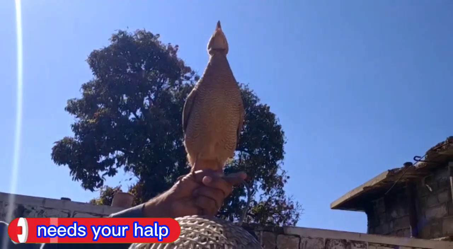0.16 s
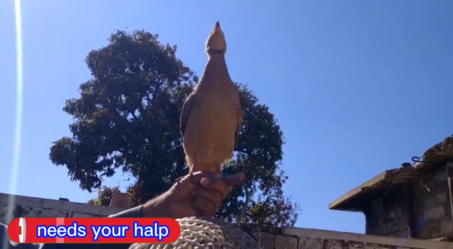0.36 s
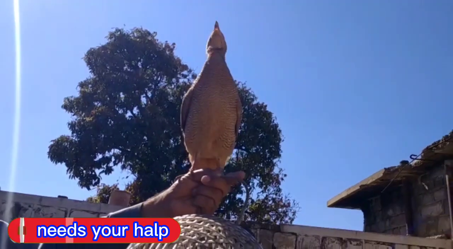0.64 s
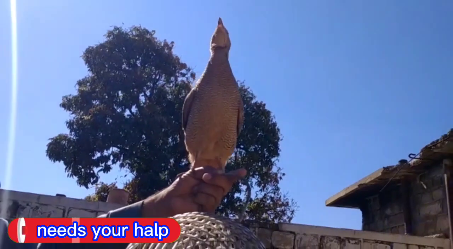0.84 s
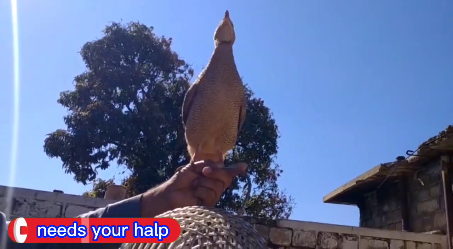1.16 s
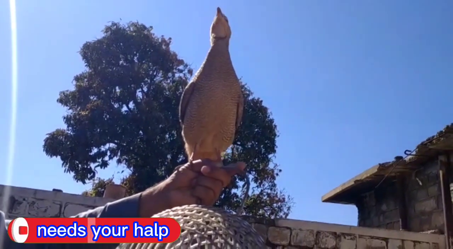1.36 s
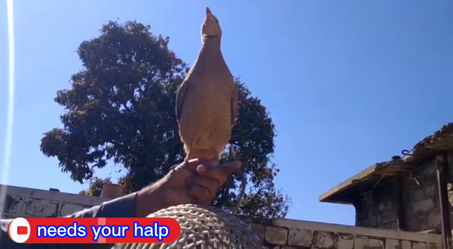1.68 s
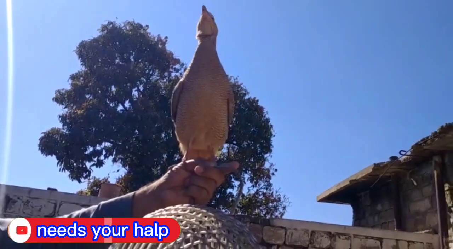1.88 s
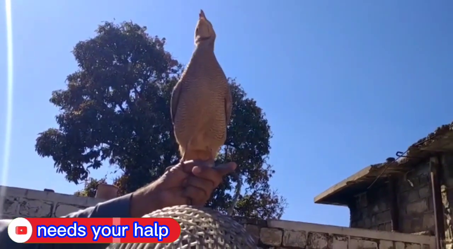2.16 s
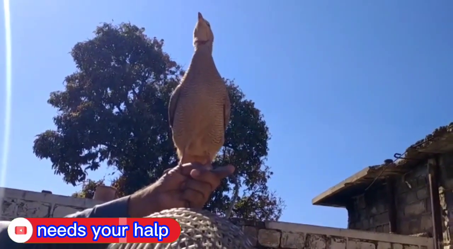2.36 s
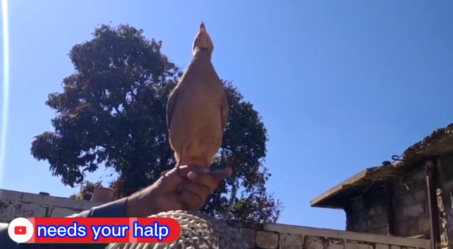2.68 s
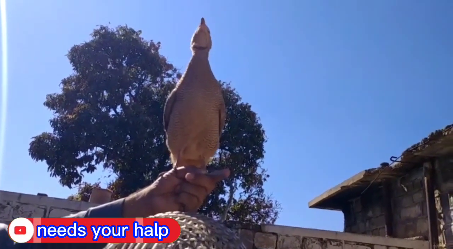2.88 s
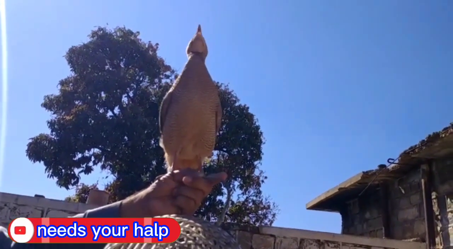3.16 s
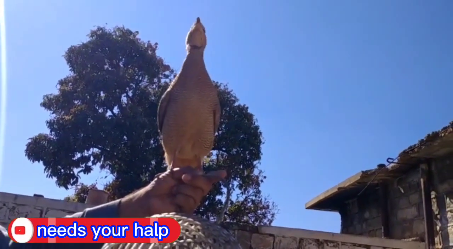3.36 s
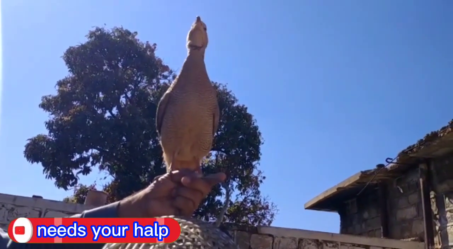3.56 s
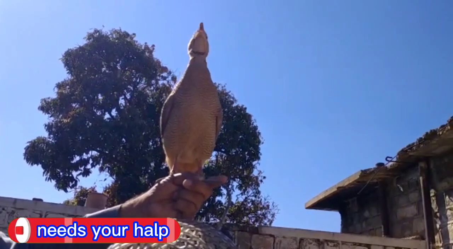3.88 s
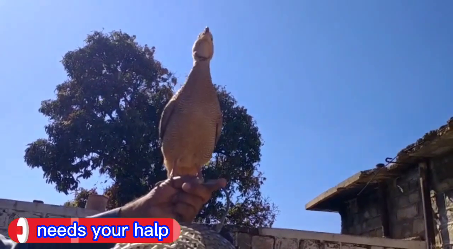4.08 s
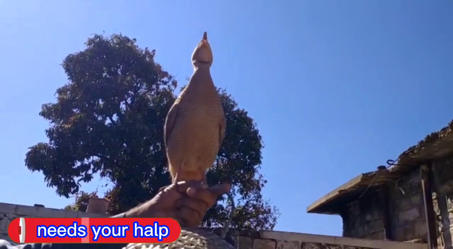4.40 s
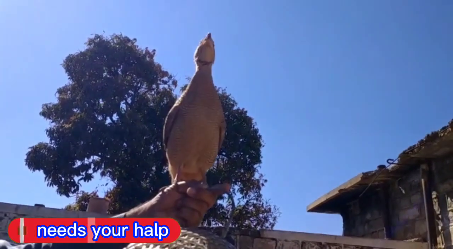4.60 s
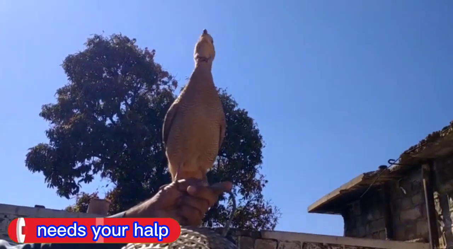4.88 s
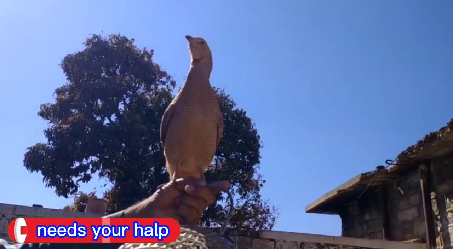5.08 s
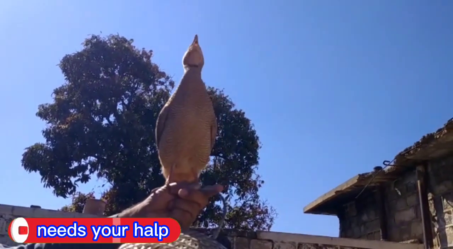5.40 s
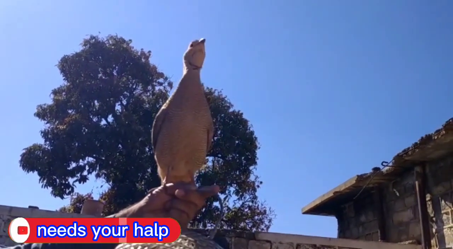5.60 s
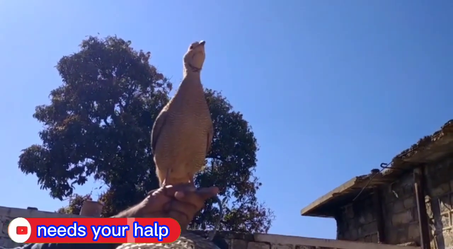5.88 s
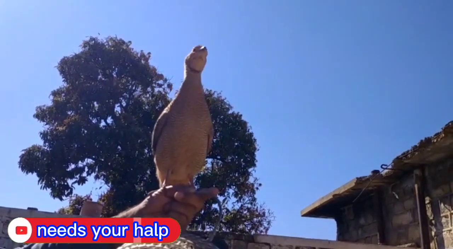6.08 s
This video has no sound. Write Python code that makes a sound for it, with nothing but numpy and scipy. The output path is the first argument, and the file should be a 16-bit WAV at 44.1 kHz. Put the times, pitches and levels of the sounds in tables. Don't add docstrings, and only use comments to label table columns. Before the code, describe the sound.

A francolin very close to the microphone calls in a steady, rapid cycle: two low buzzy chucks, a loud clear whistle with a hoarse start, a shrill squeal and a quick falling note. Near the end the cycle loosens into a run of fading chucks, then a whistle, squeal, more chucks and a last whistle. A second bird gives softer rising two-step whistles. Walls return short diffuse echoes; light wind rumbles, with one gust around three seconds.

```python
import sys
import numpy as np
from scipy import signal
from scipy.fft import rfft, irfft, next_fast_len
from scipy.io import wavfile
from scipy.ndimage import uniform_filter1d, map_coordinates

SR = 44100
rng = np.random.default_rng(int(sys.argv[2]) if len(sys.argv) > 2 else 0)


def linear_from_db(decibels):
    return 10 ** (np.asarray(decibels, float) / 20)


def output_pcm(signal):
    pcm = np.clip(np.atleast_2d(signal).T, -1, 1) * 32767
    wavfile.write(sys.argv[1], SR, np.round(pcm).astype(np.int16))


N = 275625

# time_s, level_db
WIND_LEVEL = [(0, -69), (.3, -56.5), (1.3, -58.5), (2.4, -54), (2.6, -41), (2.85, -35), (3.02, -44.5),
              (3.12, -41.5), (3.23, -30), (3.45, -49), (3.6, -54.5), (4.5, -57.5), (5.0, -54.5),
              (6.25, -59.5)]
# start_s, length_s, level_db
PUFFS = [(0.169, 0.12, -41.5), (0.44, 0.086, -39.5), (0.62, 0.12, -35.5), (0.995, 0.17, -30),
         (1.406, 0.046, -51), (1.466, 0.063, -36.5), (1.607, 0.13, -41), (1.955, 0.13, -39.5),
         (2.164, 0.12, -36.5), (2.473, 0.03, -48), (3.659, 0.13, -42.5), (3.838, 0.093, -36.5),
         (4.11, 0.04, -35.5), (4.201, 0.133, -39.5), (4.395, 0.106, -43), (5.058, 0.036, -53),
         (5.263, 0.084, -35.5), (5.441, 0.11, -46.5), (5.856, 0.067, -45), (6.039, 0.12, -35.5)]
# frequency_hz, level_db
RUMBLE_SPECTRUM = [(20, -58), (50, -36.5), (100, -1), (150, -0.5), (300, -5), (600, -10), (1000, -13.5),
                   (2000, -48)]
# frequency_hz, level_db
HISS_SPECTRUM = [(100, -9), (1000, 7), (3500, 13), (5000, 3.5), (7500, 7), (10000, -2), (14000, -7.5),
                 (15700, 4), (16000, -68)]
# start_s, level_db, start_pitch_hz, end_pitch_hz, length_s
FAR_SONG = [
    (.03, -64, 4700, 3200, .06),
    (.075, -64, 3400, 1500, .05),
    (4.975, -62, 2900, 4250, .055),
    (5.03, -58, 4250, 4400, .05),
    (.03, -62, 7700, 7100, .07),
    (4.74, -61, 7500, 7400, .24),
]

# start_s, length_s, start_pitch_hz, end_pitch_hz, level_db
OPENING = (0.15, 0.12, 1061.5, 968, -16)
# start_s, level_db, pitch_hz, length_s, lead_in_s
WHISTLES = [(.175, -8, 2000, .042, .038), (.446, -6, 2318, .058, .052), (1.001, -6, 2350, .052, .056),
            (1.471, -5, 2357, .064, .056), (2.010, -4.5, 2360, .066, .05), (2.566, -5.5, 2370, .068, .048),
            (3.124, -5.5, 2370, .067, .049), (3.679, -5.5, 2362, .067, .049), (4.253, -5, 2356, .069, .051),
            (5.268, -7, 2320, .069, .048), (6.081, -7, 2330, .068, .05)]
# frequency_hz, level_db
BEAK_SPECTRUM = [(2500, -1), (4000, -14), (4700, -17.5), (6000, -31.5), (6930, -17), (7070, -26.5),
                 (8000, -26.5), (12000, -53.5)]
# frequency_hz, level_db
SCRAPE_SPECTRUM = [(400, -31.5), (1000, -3.5), (2800, 4), (4500, -1), (7000, -11), (9500, -27),
                   (16000, -33)]
# start_s, length_s, start_ratio, middle_ratio, end_ratio (of its pitch), roughness
WHISTLE_LEAD = [
    (-.048, .015, .52, .6, .66, .15),
    (-.034, .014, .8, .7, .52, .2),
    (-.021, .021, .465, .475, .495, .1),
]
WHISTLE_LEAD_DB = [
    [-21.5, -14, -20.5, -22.5, -26.5, -36, -49, -45],
    [-21, -16.5, -28.5, -24.5, -44.5, -49, -53],
    [-16.5, -14, -19, -26, -19, -28, -30, -49, -49.5],
]
# start_s, length_s, start_ratio, middle_ratio, end_ratio, roughness
WHISTLE_AFTER = [
    (0, .009, .98, .93, .84, .2),
    (.008, .022, .47, .465, .45, .25),
]
WHISTLE_AFTER_DB = [
    [-17, -21, -21, -34, -44],
    [-21, -32, -27, -35, -34, -34],
]

# frequency_hz, t60_s
YARD_DECAY = [(300, 0.13), (1500, 0.49), (2500, 0.5), (5000, 0.4), (10000, 0.37)]
# frequency_hz, level_db
CARRY_SPECTRUM = [(300, -17.5), (900, -1.5), (1600, 0.5), (2600, 3), (5000, -1), (7000, 1), (9000, 10),
                  (16000, -15)]

# start_s, length_s, start_pitch_hz, end_pitch_hz, level_db
LOW_STEPS = [
    (.164, 0.049, 1550, 2140, -16.5),
    (.783, 0.07, 1500, 2146, -11.5),
    (1.451, 0.027, 1925, 2060, -15.5),
    (5.084, 0.042, 1967, 2167, -13),
    (5.899, 0.044, 1817, 2070, -11),
]
# start_s, length_s, start_pitch_hz, end_pitch_hz, level_db
HIGH_STEPS = [
    (.228, 0.049, 2580, 2750, -23),
    (.29, 0.043, 2810, 2855, -19),
    (.85, 0.038, 2550, 2760, -12.5),
    (1.495, 0.087, 2670, 2766, -20.5),
    (2.1, 0.054, 2735, 2790, -20.5),
    (4.517, 0.11, 2750, 2672, -19.5),
    (4.615, 0.077, 2750, 2737, -38.5),
    (5.122, 0.042, 2657, 2784, -19),
    (5.16, 0.089, 2790, 2765, -24),
    (5.94, 0.094, 2530, 2740, -12),
]

# start_s, level_db, start_pitch_hz, end_pitch_hz, length_s
HIGH_FALLS = [
    (.238, -15, 2540, 2170, 0.022),
    (.690, -15.5, 2554, 2206, 0.029),
    (1.118, -17, 2580, 2180, .029),
    (2.238, -18, 2560, 2190, 0.027),
    (2.793, -16.5, 2574, 2223, 0.025),
    (3.352, -16.5, 2572, 2264, 0.024),
]
# start_s, level_db, start_pitch_hz, end_pitch_hz, length_s
LOW_FALLS = [
    (1.682, -14, 2040, 1680, 0.038),
    (3.911, -13.5, 2050, 1650, 0.033),
    (4.470, -13.5, 2030, 1700, .026),
    (5.518, -13, 2030, 1740, .016),
    (5.448, -8.5, 2040, 2030, .014),
    (5.496, -20, 2068, 2024, 0.024),
]
HIGH_PARTIALS = [-8, 0, -42, -44, -44, -38]
LOW_PARTIALS = [2, -11.5, -16, -22, -36.5, -44, -40]
# frequency_hz, level_db
RASP_SPECTRUM = [(200, -20), (1500, -14.5), (2000, 0), (2600, -4), (3300, -17), (5000, -6.5), (6500, -33),
                 (10000, -42), (16000, -54.5)]

# start_s, pulse_level_db, top_pitch_hz, clear_ending_db
CHUCKS = [(0.387, -18.5, 482, -17.5), (.856, -18.5, 592, -7), (1.260, -17.5, 573.6, -5.5),
          (1.364, -19.5, 545, -6), (1.822, -16, 564.6, -7), (1.927, -16.5, 535, -11.5),
          (2.378, -16.5, 539.3, -8.5), (2.483, -18, 514, -11.5), (2.939, -15, 535.6, -8),
          (3.043, -18, 503, -28), (3.492, -15.5, 524, -10.5), (3.594, -17.5, 521.5, -29),
          (4.05, -16, 503, -15), (4.151, -19.5, 440, -21.5), (4.61, -17.5, 490.5, -15.5),
          (4.710, -19, 429.7, -21), (4.808, -21, 401, -39), (4.904, -26.5, 441, -34),
          (5.011, -38.5, 280, -64), (5.639, -19, 418.5, -19.5), (5.733, -21.5, 380.6, -40),
          (5.826, -27.5, 470, -49), (5.917, -35.5, 294, -71)]
# frequency_hz, level_db
CHUCK_THROAT = [(200, -37.5), (500, -23), (1000, -12.5), (1300, -5), (1600, 1.5), (2100, -15),
                (2800, -26.5), (3500, -26)]
# frequency_hz, level_db
CHUCK_AIR = [(1000, -30.5), (2400, -9), (3900, -20), (4800, 0.5), (6500, -23.5), (10000, -34), (12500, -19),
             (15200, -20), (16000, -41.5)]
ENDING_PARTIALS = [3, -19.5, -16.5, -30, -38, -48.5, -44.5]

# start_s, level_db, start_pitch_hz, end_pitch_hz, length_s
GULPS = [
    (.448, -30, 130.5, 130, 0.04),
    (1.5, -36.5, 293, 250, 0.03),
    (2.633, -28, 328, 229, 0.0375),
    (4.115, -30, 520, 88, 0.0228),
    (3.2, -32, 260, 120, 0.078),
    (4.665, -53, 248, 110, 0.013),
    (4.3, -40, 310, 190, .03),
    (5.866, -28, 314, 177, .045),
    (6.086, -26, 333, 259, 0.071),
    (7.2, -39, 301, 185, 0.054),
]

# start_s, level_db, second_partial_hz, length_s, side_tones_db
SQUEALS = [
    (0.626, -14, 5078, .036, 2),
    (1.048, -14, 5220, 0.035, 5),
    (1.617, -15, 5170, 0.035, 4),
    (2.175, -14, 5147, .038, 3.5),
    (2.73, -14, 5137, 0.04, 3.5),
    (3.286, -14, 5173, 0.041, 3),
    (3.845, -14.5, 5160, .043, 3.5),
    (4.405, -15.5, 5144, 0.037, 5),
    (5.45, -14.5, 5050, .0017, -48),
    (5.462, -13, 5070, 0.032, -4.5),
]
SLURRED = [1.05, 5.462]
SQUEAL_PARTIALS = [-16, 0, -34, -43, -43, -33]
# start_s, length_s, start_ratio, middle_ratio, end_ratio (of its pitch), roughness
SQUEAL_LEAD = [
    (-.043, .013, .62, .74, .68, .2),
    (-.03, .017, .4, .39, .39, .45),
    (-.013, .007, .78, .78, .78, .15),
    (-.006, .006, .88, .92, .98, .3),
]
SQUEAL_LEAD_DB = [
    [-3.5, -6, -8, -17, -28.5],
    [-16, -8.5, -7.5, -17, -9.5, -26.5, -19],
    [-20, -3.5, -21],
    [4.5, -3, -15],
]
# start_s, length_s, start_ratio, middle_ratio, end_ratio, roughness
SQUEAL_AFTER = [
    (-.001, 0.00645, 1, .9, 0.79, 0.11),
]
SQUEAL_AFTER_DB = [
    [0.019, -14.5, -27],
]


def unit(x):
    return x / np.sqrt(np.mean(x ** 2) + 1e-20)


def along(points, hz):
    f, v = np.transpose(points)
    return np.interp(np.log(hz + 1), np.log(f + 1), v)


def coloured(x, points):
    m = next_fast_len(len(x) + 2048)
    gain = linear_from_db(along(points, np.fft.rfftfreq(m, 1 / SR)))
    return irfft(rfft(x, m) * gain, m)[:len(x)]


def wobble(size, rate):
    return map_coordinates(rng.standard_normal(4000), [np.arange(size) * rate / SR], mode="wrap")


def add(track, s, x):
    first = round(s * SR)
    track[first:][:len(x)] += x[:N - first]


def fade(size, edge):
    t = np.arange(size) / SR
    return np.sin(np.pi / 2 * np.clip(np.minimum(t, t[-1] - t) / edge, 0, 1)) ** 2


def swept_gain(db, change_db, size):
    return linear_from_db(db + change_db * np.linspace(0, 1, size))


def voice(length, start, middle, end, partials, rough, edge=0.0012):
    size = round(max(length, .002) * SR)
    u = np.arange(size) / size
    pitch = start * (1 - u) * (1 - 2 * u) + 4 * middle * u * (1 - u) + end * u * (2 * u - 1)
    rough = np.clip(rough, 0, 1)
    phase = 2 * np.pi * np.cumsum(pitch) / SR + 1.17 * rough * wobble(size, 899.0)
    tone = sum(linear_from_db(db) * np.sin((k + 1) * phase + k * k) for k, db in enumerate(partials))
    noise = np.diff(rng.standard_normal(2000), prepend=0)[np.arange(size) % 2000]
    breath = 1.5 * noise * (1 + np.cos(phase))
    breath = coloured(breath, [(900, 2.5), (5500, 1.0), (9000, -21.0), (16000, -27.5)])
    return (tone * (1 + rough * wobble(size, 500)) + 0.27 * rough * breath) * fade(size, edge)


def syllables(track, shapes, levels, s, hz, db, stretch=1):
    for (at, length, a, b, c, rough), partials in zip(shapes, levels):
        sound = voice(length * stretch, a * hz, b * hz, c * hz, partials, rough)
        add(track, s + at * stretch, linear_from_db(db) * sound)


def rasp(spectrum, length):
    size = round(length * SR)
    return unit(coloured(rng.standard_normal(3000), spectrum))[:size] * fade(size, 0.00084)


def background(level, spectrum, lumpy_db):
    lumps = map_coordinates(rng.standard_normal(300), [np.arange(N) * 40 / SR])
    noise = coloured(rng.standard_normal(N), spectrum) * linear_from_db(lumpy_db * lumps)
    return level * unit(noise)


def wind():
    s, db = np.transpose(WIND_LEVEL)
    level = linear_from_db(np.interp(np.arange(N) / SR, s, db))
    for start, length, puff_db in PUFFS:
        add(level, start, linear_from_db(puff_db - 0.16) * fade(round(length * SR), 0.011))
    return background(level, RUMBLE_SPECTRUM, lumpy_db=4.0)


def hiss(near, other):
    floor_db, open_db, follow_s = -62.5, -21.5, 0.052
    shrill = np.abs(coloured(near, [(2500, -34.5), (4000, 5.5)])) + linear_from_db(-0.1) * np.abs(other)
    closing = np.exp(-np.arange(SR // 2) / (follow_s * SR))
    envelope = signal.fftconvolve(shrill, closing / closing.sum())[:N]
    return background(linear_from_db(floor_db) + linear_from_db(open_db) * envelope, HISS_SPECTRUM, lumpy_db=2.0)


def glides(track, table, rough):
    for s, db, start, end, length in table:
        add(track, s, linear_from_db(db) * voice(length, start, (start + end) / 2, end, [0], rough, edge=0.0055))


def far_song(near):
    glides(near, FAR_SONG, rough=.7)


def whistles(near, duck):
    thump_db, thump_s = -27, 0.02164
    recover_db, recover_s = 5.5, 0.054
    s, length, start, end, db = OPENING
    hoarse = voice(length, start, (start + end) / 2, end, [-16, -2, -1.5, -18, -14], rough=0.29)
    add(near, s, swept_gain(db, -15, len(hoarse)) * hoarse)
    for s, db, hz, length, lead in WHISTLES:
        syllables(near, WHISTLE_LEAD, WHISTLE_LEAD_DB, s, hz, db, lead / .048)
        add(near, s - lead, linear_from_db(db - 19) * rasp(SCRAPE_SPECTRUM, 0.54 * lead))
        partials = along(BEAK_SPECTRUM, hz * np.arange(1, 7))
        tone = voice(length, hz, .996 * hz, .992 * hz, partials, rough=0.062, edge=0.0026)
        add(near, s - .002, swept_gain(db, -0.84, len(tone)) * tone)
        thump = voice(thump_s, 434, 206, 90, [0], rough=.1, edge=0.007)
        add(near, s + length - thump_s / 2, linear_from_db(db + thump_db) * thump)
        if length > .055:
            syllables(near, WHISTLE_AFTER, WHISTLE_AFTER_DB, s + length - .006, hz, db)
        add(duck, s, np.full(len(tone) + 150, 10.))
        add(duck, s + length + 0.0026, recover_db * np.linspace(1, 0, round(recover_s * SR)))


def yard(x):
    out, hop = np.zeros(N + 2 * SR), 8192
    for i in range(-hop, N, hop):
        hz, t, z = signal.stft(rng.standard_normal(SR // 2), SR, nperseg=256)
        decay = linear_from_db(-60 * t / along(YARD_DECAY, hz)[:, None])
        tail = signal.istft(z * decay, SR, nperseg=256)[1]
        piece = np.pad(x, hop)[i + hop:i + 3 * hop]
        piece = piece * np.hanning(2 * hop)[:len(piece)]
        echo = signal.fftconvolve(piece, tail / np.linalg.norm(tail))
        out[i + hop:][:len(echo)] += echo
    delayed = np.pad(out[hop:], (300, 0))[:N]
    return coloured(delayed, CARRY_SPECTRUM)


def other_bird(other):
    glide_bend = .85
    low_shape, high_shape = (0.016, 0.0089, -.5), (0.0091, 0.01, -2.1)  # attack_s, release_s, drift_db
    for table, (attack, release, drift_db) in ((LOW_STEPS, low_shape), (HIGH_STEPS, high_shape)):
        for s, length, start, end, db in table:
            t = np.arange(0, length, 1 / SR)
            phase = 2 * np.pi * np.cumsum(start + (end - start) * (t / length) ** glide_bend) / SR
            swell = np.sin(np.pi / 2 * np.clip(np.minimum(t / attack, (length - t) / release), 0, 1)) ** 2
            flutter_db = 0.75 + 0.29 * max(-18.5 - db, 0)
            gain = linear_from_db(db + 2.5 + drift_db * t / length + flutter_db * wobble(len(t), 70))
            add(other, s, gain * swell * (np.sin(phase) + linear_from_db(-58) * np.sin(2 * phase)))


def falls(near, far):
    longest_rasp_s = .045
    ends = np.array([row[0] + row[3] for row in WHISTLES + SQUEALS]) - .001
    high, low = (HIGH_FALLS, HIGH_PARTIALS, -3, 0), (LOW_FALLS, LOW_PARTIALS, -7, -16)
    for table, partials, rasp_db, catch_db in (high, low):
        for s, db, start, end, length in table:
            gap = s - ends[ends < s].max()
            hoarse = gap if gap < longest_rasp_s else .002
            middle = .68 * start + .32 * end
            add(near, s - hoarse, linear_from_db(db + rasp_db) * rasp(RASP_SPECTRUM, hoarse))
            add(near, s, linear_from_db(db) * voice(length, start, middle, end, partials, rough=0.04, edge=0.0019))
            catch = voice(0.0117, 1674, 1678, 1545, [0, -12, -14], rough=0.35)
            add(near, s + length, linear_from_db(db + catch_db) * catch)
            to_walls = voice(length, start, middle, end, [0, -30, -19], rough=0.14)
            add(far, s, linear_from_db(db + catch_db / 2.45 + 6) * to_walls)


def chucks(near):
    chuck_s, speed_up_s = 0.045, .024
    start_share, share_per_db = .46, -0.03
    sag, waver_db = 0.15, 5
    dulling = 0.83
    t = np.arange(round(.06 * SR)) / SR
    u, k = np.clip(t / chuck_s, 0, 1), np.arange(1, 10)[:, None]
    for s, db, top, clear_db in CHUCKS:
        first = np.clip(start_share - share_per_db * (db + 18), .3, 1)
        length = np.clip(.034 - (1750 - 3 * top) * 1e-4, .021, .034)
        clear_at = 0.02384 - 0.0044 * (clear_db < -10)
        late = np.clip((t - clear_at) / length, 0, 1)
        climb = first + (1 - first) * np.sin(np.pi / 2 * np.clip(t / speed_up_s, 0, 1)) ** 1.4
        pitch = top * climb * (1 - sag * late ** 2) * (1 + .018 * wobble(len(t), 249))
        phase = 2 * np.pi * np.cumsum(pitch) / SR

        waver = waver_db * np.array([wobble(len(t), 139) for _ in k])
        throat = linear_from_db(along(CHUCK_THROAT, k * pitch * (520 / top) ** 0.48) + waver)
        buzz = (throat * np.cos(k * phase - 0.906 * k * k)).sum(axis=0)
        breath = coloured(rng.standard_normal(len(t)) * (1.8 + np.cos(phase)), CHUCK_AIR)
        breath_gain = linear_from_db(dulling * (db + 18) - 14) * np.sin(np.pi * u)
        pulse = np.sin(np.pi * u ** 0.83) ** 1.03
        hand_over = linear_from_db(-.9 * max(clear_db + 21.5, 0) * np.clip((t - clear_at) / 0.0031, 0, 1))
        add(near, s, linear_from_db(db + 1) * (unit(buzz) + breath_gain * unit(breath)) * pulse * hand_over)

        clear = sum(linear_from_db(g) * np.sin(3 * (j + 1) * phase) for j, g in enumerate(ENDING_PARTIALS))
        swell = np.sin(np.pi / 2 * np.clip(np.minimum(late, 1 - late) * length / 0.0053, 0, 1)) ** 2
        add(near, s, linear_from_db(clear_db - 4.2 * late + wobble(len(t), 203)) * swell * clear)


def gulps(near):
    glides(near, GULPS, rough=.01)


def squeals(near, far, duck):
    for s, db, hz, length, side_db in SQUEALS:
        f0 = hz / 2
        slurred = np.abs(s - np.array(SLURRED)).min() < .005
        if not slurred:
            lead = SQUEAL_LEAD[:4 if length > .01 else 3]
            syllables(near, lead, SQUEAL_LEAD_DB, s, f0, db - .7)
        if length > .01:
            syllables(near, SQUEAL_AFTER, SQUEAL_AFTER_DB, s + length, f0, db)
        squeal = voice(length, 1.006 * f0, f0, .985 * f0, SQUEAL_PARTIALS, rough=.04, edge=.0015)
        add(near, s, linear_from_db(db) * squeal)
        slow = voice(length, 412, 558.6, 688, [0, -30], rough=0.055 + 1.04 * slurred)
        add(near, s, linear_from_db(db + side_db - 14.5) * slow)
        for sign, line_db in ((-1, -23), (1, -22)):
            line = voice(length, f0 + sign * 420, f0 + sign * 560, f0 + sign * 700, [0], rough=.3)
            add(near, s, linear_from_db(db + side_db + line_db) * line)
        add(far, s, linear_from_db(db + 3.0) * voice(length, f0, f0, .98 * f0, [0, -30, -17], rough=0.12))
        duck_db = 2. if s == SLURRED[0] else 14.
        add(duck, s, np.full(round(length * SR), duck_db))


def scene():
    near, far, duck, other = np.zeros((4, N))
    whistles(near, duck)
    other_bird(other)
    falls(near, far)
    chucks(near)
    squeals(near, far, duck)
    echoes = linear_from_db(-4) * yard(near + far + linear_from_db(-9) * other)
    loud = uniform_filter1d(np.abs(near + other + echoes), size=900)
    echoes *= loud / (loud + linear_from_db(-34.5))
    air = hiss(near, other)
    duck = uniform_filter1d(duck, size=90)
    far_song(near)
    gulps(near)
    return (near + other + echoes * linear_from_db(-duck) + air * linear_from_db(-.4 * duck) + wind())[None]


def top_cut(x):
    return signal.sosfilt(signal.butter(12, 16420, fs=SR, output="sos"), x)


def record(dry):
    soft = dry / (1 + np.abs(dry / 1.05) ** 4) ** 0.28
    mix = coloured(soft[0], [(30, -12), (70, 0), (15700, 0), (16100, -40)])[None]
    return top_cut(mix)


dry = scene()
out = record(dry)
output_pcm(out)
```